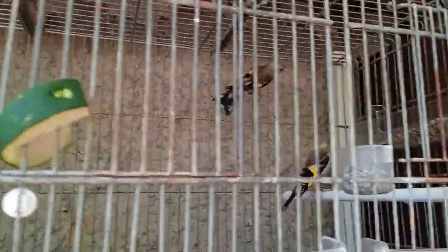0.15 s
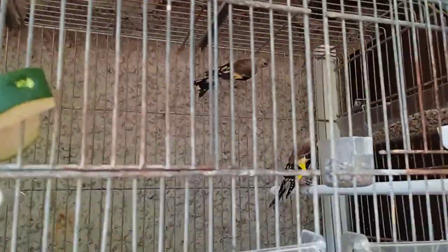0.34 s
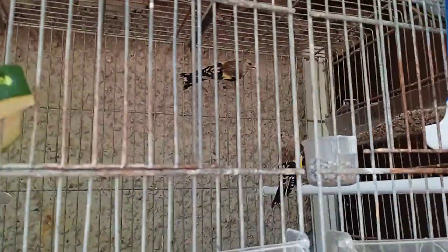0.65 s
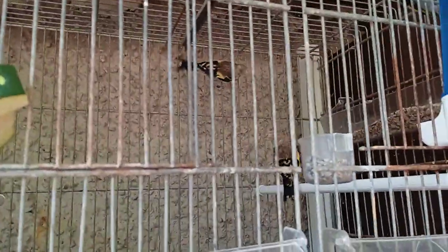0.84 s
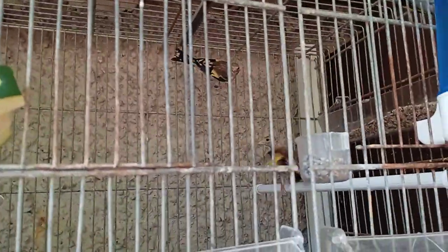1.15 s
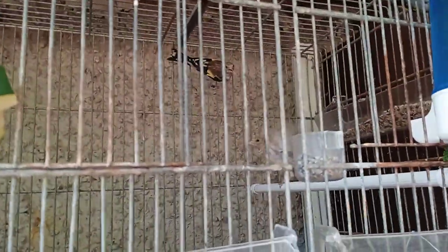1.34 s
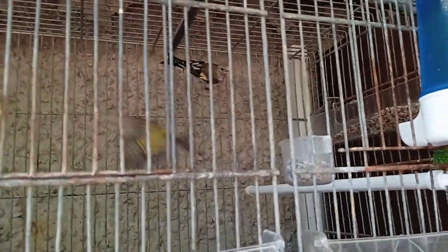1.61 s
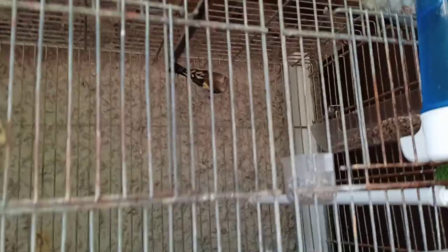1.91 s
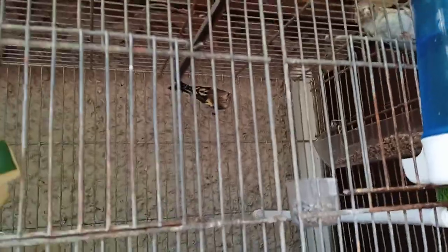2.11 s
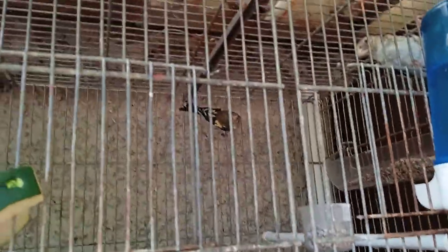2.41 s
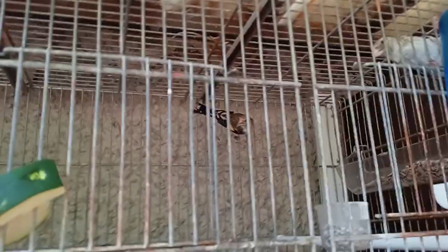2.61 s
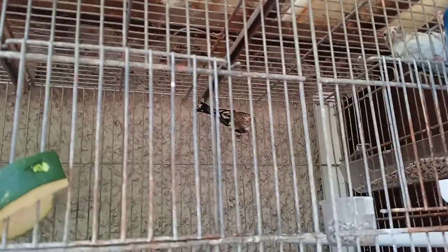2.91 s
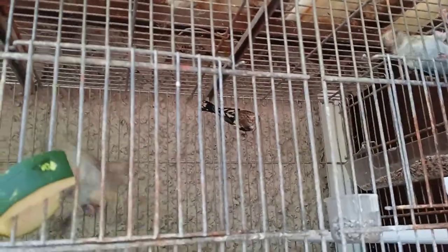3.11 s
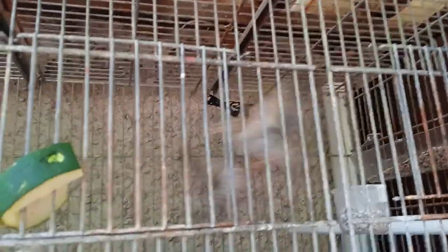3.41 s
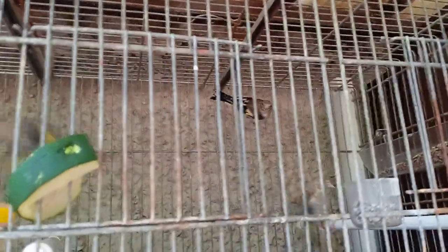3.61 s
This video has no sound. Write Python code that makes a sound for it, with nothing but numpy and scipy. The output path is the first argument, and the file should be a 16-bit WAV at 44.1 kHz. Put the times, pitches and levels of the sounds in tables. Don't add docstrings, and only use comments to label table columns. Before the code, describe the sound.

Finch chirps sweep upward in clusters, with distant peeps, light cage scuffs and faint microphone hiss.

```python
import sys
import numpy as np
from scipy import signal
from scipy.io import wavfile
from scipy.ndimage import uniform_filter1d

SR = 44100
rng = np.random.default_rng(int(sys.argv[2]) if len(sys.argv) > 2 else 0)


def boost_factor(decibels):
    exponent = np.asarray(decibels, float) / 20
    return 10 ** exponent


def int16_out(signal):
    q = np.round(np.clip(np.atleast_2d(signal).T, -1, 1) * 32767)
    wavfile.write(sys.argv[1], SR, q.astype(np.int16))


N = 165375

# time in seconds, pitch in Hz, level of the second partial in dB.
LEFT_CALL_1 = [(0.179, 1643, -60), (.205, 1756, -49), (.235, 1987, -42), (.252, 2026, -50),
               (0.267, 2082, -41), (0.283, 2098, -46), (0.301, 2112, -40.5), (0.386, 2186, -47.5),
               (0.548, 2244, -64)]
LEFT_CALL_2 = [(.692, 1300, -105), (.72, 1893, -66), (.744, 2286, -48.5), (.778, 2283, -52.5)]
LEFT_CALL_3 = [(.78, 2094, -56), (.84, 2266, -75), (0.871, 2397, -58.5), (0.904, 2443, -54),
               (.918, 2700, -53.5), (0.986, 2510, -54.5), (1.015, 2447, -71)]
LEFT_CALL_4 = [(1.41, 1118, -89), (1.446, 1596, -43.5), (1.484, 2030, -42.5), (1.539, 2510, -43),
               (1.551, 2560, -67), (1.6, 2820, -63)]
LEFT_CALL_5 = [(2.888, 1548, -80), (2.92, 1847, -44.5), (2.96, 2034, -41.5), (3.02, 2115, -44.5),
               (3.09, 2175, -49.5), (3.11, 2206, -64.5), (3.2, 2252, -55.5), (3.27, 2300, -57)]
LEFT_CALL_6 = [(3.205, 1619, -76), (3.231, 2202, -49.5), (3.25, 2336, -54), (3.27, 2375, -62)]
LEFT_CALL_7 = [(3.275, 2163, -59), (3.35, 2246, -75), (3.378, 2446, -60.5), (3.44, 2484, -48.5),
               (3.49, 2480, -50), (3.52, 2470, -70)]
LEFT_CALL_8 = [(3.463, 1396, -80), (3.49, 1668, -35.5), (3.504, 1830, -43), (3.513, 1942, -31),
               (3.548, 2230, -35), (3.572, 2360, -62), (3.586, 2403, -37.5), (3.64, 2743, -58.5),
               (3.7, 2816, -59)]
# time in seconds, pitch in Hz, level of the lowest partial in dB.
RIGHT_CALL_1 = [(0.181, 2190, -67), (0.202, 2353, -59.5), (0.213, 2470, -58.5), (0.242, 2900, -62),
                (.27, 3020, -65), (0.329, 3330, -74)]
RIGHT_CALL_2 = [(.69, 1750, -90), (0.711, 2415, -75), (0.726, 2600, -65), (0.739, 3040, -83)]
RIGHT_CALL_3 = [(.775, 3230, -61), (0.839, 3740, -52), (0.889, 4090, -52.5), (0.904, 4300, -54.5),
                (.918, 4000, -65), (0.931, 3450, -73), (0.944, 3780, -66), (0.984, 3700, -73)]
RIGHT_CALL_4 = [(1.416, 1640, -56), (1.437, 2150, -64.5), (1.46, 2350, -81), (1.478, 2430, -78),
                (1.5, 3100, -68), (1.557, 3850, -63.5)]
RIGHT_CALL_5 = [(2.884, 2000, -69.5), (2.908, 2435, -61), (2.928, 2607, -62.5), (2.969, 2950, -62.5),
                (3.0, 3060, -71), (3.051, 3160, -72)]
RIGHT_CALL_6 = [(3.194, 2350, -79), (3.213, 2600, -65), (3.237, 2970, -77)]
RIGHT_CALL_7 = [(3.27, 3248, -59), (3.383, 3960, -49), (3.46, 3850, -57)]
RIGHT_CALL_8 = [(3.458, 1810, -56.5), (3.474, 2002, -47), (3.485, 2360, -88), (3.509, 2880, -85),
                (3.561, 3650, -56), (3.588, 3640, -69), (3.608, 3780, -59), (3.632, 3900, -46.5)]
# multiple of the pitch, level in dB.
LEFT_PARTIALS = [(1, 3.5), (2, 0), (3, -16), (4, -3.5), (5, -0.5), (6, -5), (7, -5.5)]
# times left pitch, times right pitch, level in dB.
SUM_TONES = [(1, 1, -3), (2, 1, -3.5), (1, 2, -5.5)]
VOICE_CATCHES = [0.2237, 1.46, 1.467, 1.494, 1.503, 1.523, 3.473, 3.482, 3.525, 3.535, 3.544]
# level in dB, centre in Hz.
CALL_RASPS = [(-4.5, 5000), (-3, 5600), (-20, 4500), (-6.5, 5100), (-4, 5200), (-7, 6800), (-12, 5000),
              (-9.5, 4600)]
# frequency in Hz, gain in dB.
THROAT_AND_BEAK = [(1700, -6), (2400, -17.5), (3400, -5), (4800, -2), (5700, -13), (7200, -12.5),
                   (8000, -29.5), (11000, -24.5)]
# start in
# seconds, length in seconds, level in dB, first and last pitch in Hz.
SHORT_PEEPS = [(1.606, 0.03, -50.5, 3170, 3430), (1.32, 0.026, -55, 4170, 4970),
               (1.347, 0.027, -51, 4480, 5450), (1.577, 0.042, -52.5, 4270, 4170),
               (1.588, 0.054, -40, 2800, 2908), (1.631, 0.039, -51, 4300, 4100),
               (1.693, 0.031, -56.5, 4300, 4115), (1.834, 0.26, -66, 1987, 1918),
               (2.026, 0.041, -55.5, 6640, 6460), (2.156, 0.03, -57, 4630, 4960),
               (2.751, 0.03, -63.5, 4100, 4700), (2.78, 0.059, -65, 5080, 5560),
               (3.095, 0.022, -56.5, 2720, 3350), (3.159, 0.029, -58, 2730, 3300),
               (3.678, 0.019, -49.5, 4400, 4820), (1.215, .03, -73, 4500, 4700),
               (1.238, .05, -72.5, 4200, 3850), (1.282, 0.0516, -75.5, 1740, 2020),
               (1.369, .022, -57.5, 5530, 5700), (1.349, .02, -66, 2820, 3120),
               (0.576, 0.06, -70, 1617, 1670), (2.018, .04, -58.5, 7600, 7130),
               (3.196, 0.059, -55, 4500, 6910), (.715, 0.056, -52.5, 5300, 7030),
               (3.706, 0.035, -46, 4320, 5710), (3.714, 0.071, -51.5, 3400, 4080)]
# start in seconds, length in seconds, level in dB, first and last pitch in Hz.
FAR_SQUAWK = (2.465, .14, -63.5, 4901, 3401)
# time in seconds, peak in dB, level of the low part in dB.
WIRE_SCUFFS = [(0.012, -56, 5), (0.104, -61.5, 12.5), (0.377, -53.5, -16), (1.6733, -61.5, 5),
               (1.76, -56.5, 13), (1.796, -59.5, 16.5), (1.8345, -60.5, 18), (2.103, -65.5, 17),
               (2.2283, -50.5, 6.5), (2.285, -62, 4), (3.359, -59.5, 9), (3.475, -59.5, 22.5),
               (1.127, -77, -16), (1.618, -61, 4.5), (1.656, -65, 16), (1.705, -65, 12), (1.749, -67, 3),
               (1.9127, -63, 14), (1.939, -77, 23), (2.148, -61.5, 8), (2.196, -57.5, 12), (2.24, -61, 1),
               (2.423, -65, 12), (2.4708, -66, 14), (2.5856, -69.5, 15), (2.6963, -74.5, 21),
               (2.7343, -69.5, 18), (2.935, -63, 16.5), (3.056, -65, 11.5), (3.142, -68, 13),
               (3.223, -68.5, 14), (3.266, -69.5, 21.5), (3.318, -62.5, 11.5), (3.589, -63.5, 18.5),
               (3.626, -65.5, 17), (3.701, -66, 15), (.395, -58, -9), (1.409, -62, 2)]
# frequency in Hz, level in dB.
SCRAPE_COLOUR = [(1000, -14), (1600, -6), (4500, -13.5), (6400, -8.5), (11000, -22.5), (13500, -31),
                 (15300, -8)]
# frequency in Hz, level in dB.
SHUFFLE_COLOUR = [(40, -10), (85, -0.5), (200, -3.5), (560, -8.5), (1900, -14), (2600, -35.5)]
# time in seconds, level in dB.
STIRRING = [(0, -62), (.08, -61), (.19, -71), (.6, -77.5), (1.58, -78), (1.66, -67), (2.15, -68.5),
            (2.3, -61), (2.39, -72), (2.5, -67), (2.66, -75), (2.76, -68), (2.88, -75.5), (3.2, -71.5),
            (3.46, -63), (3.75, -67.5)]
# frequency in Hz, level in dB, seconds to fall 60 dB.
FEEDER_TONES = [(653.3, -58.5, 1), (971, -42.5, 0.12), (1806, -46.5, 0.22)]
# time in seconds, level in dB.
FEEDER_KNOCKS = [
    (.043, -8),
    (.056, -9),
    (.066, -4.5),
    (0.081, -10.5),
]
# frequency in Hz, level in dB.
HISS_COLOUR = [(40, -35), (90, -8), (700, -31), (1700, -11.5), (2600, -16.5), (4500, -15.5), (6000, -1),
               (13000, -37.5), (15300, -17.5)]

STEADY_DB, BROKEN_DB = 4, 5.5
PITCH_JITTER = 0.00667


def read(points, hz):
    f, value = np.transpose(points)
    return np.interp(np.log(hz + 1), np.log(f + 1), value)


def slow(length, span):
    x = uniform_filter1d(rng.standard_normal(length), size=span)
    x = uniform_filter1d(x, size=span)
    return x / x.std()


def noise(spectrum, patchy_db):
    a, b, patch = rng.standard_normal((N // 128 + 5, 257, 3)).T
    patch = uniform_filter1d(uniform_filter1d(patch, 6, 0), 12, 1)
    colour_db = read(spectrum, np.fft.rfftfreq(512, 1 / SR))[:, None]
    z = (a + 1j * b) * boost_factor(colour_db + patchy_db * patch / patch.std())
    x = signal.istft(z, nperseg=512, noverlap=384)[1][:N]
    return x / x.std()


def band(length, hz, width_hz):
    span = round(SR / width_hz)
    turn = 2 * np.pi * np.cumsum(hz * np.ones(length)) / SR
    return slow(length, span=span) * np.cos(turn) + slow(length, span=span) * np.sin(turn)


def hiss():
    return boost_factor(-67) * noise(HISS_COLOUR, 1.6)


def scuffs():
    t, high, low = np.arange(N) / SR, np.zeros(N), np.zeros(N)
    for s, db, low_db in WIRE_SCUFFS:
        u = np.maximum(t - s + 0.0018, 0)
        shape = np.minimum(u / 0.0029, 1) * np.exp(-u / 0.016) * boost_factor(db)
        high += shape
        low += shape * boost_factor(low_db)
    grit = boost_factor(3.17 * slow(N, span=50))
    stir = boost_factor(np.interp(t, *np.transpose(STIRRING)) + 1.4 * slow(N, span=700))
    bright = boost_factor(3) * high + boost_factor(-9.5) * stir ** 2 / stir.mean()
    dull = boost_factor(-11.5) * low + stir
    return grit * bright * noise(SCRAPE_COLOUR, 1.6) + dull * noise(SHUFFLE_COLOUR, 3.0)


def feeder():
    t, out = np.arange(N) / SR, np.zeros(N)
    for s, knock_db in FEEDER_KNOCKS:
        for hz, db, t60 in FEEDER_TONES:
            fade = boost_factor(knock_db + db - 60 * abs(t - s) / t60) * (t > s)
            out += fade * np.sin(2 * np.pi * hz * (t - s))
    return out * boost_factor(5.7 * np.minimum(slow(N, span=60), .8))


def squawk():
    s, length, db, first_hz, last_hz = FAR_SQUAWK
    u, out = np.linspace(0, 1, round(length * SR)), np.zeros(N)
    hz = last_hz + (first_hz - last_hz) * (1 - u) ** 2
    swell = boost_factor(db + 3.2 * slow(len(u), span=150)) * np.sin(np.pi * u)
    out[round(s * SR):][:len(u)] = swell * band(len(u), hz, 900)
    return out


def peeps():
    out = np.zeros(N + SR)
    for s, length, db, first_hz, last_hz in SHORT_PEEPS:
        u = np.linspace(0, 1, round(length * SR))
        hz = last_hz + (first_hz - last_hz) * (1 - u) ** 2.4
        turn = 2 * np.pi * np.cumsum(hz) / SR
        out[round(s * SR):][:len(u)] += boost_factor(db) * np.sqrt(abs(np.sin(np.pi * u))) * np.sin(turn)
    return out[:N] * boost_factor(5 * np.minimum(slow(N, span=150), .5))


def room(x):
    at = np.arange(90, 12000, 22) + rng.integers(0, 22, 542)
    taps = np.zeros(12100)
    taps[at] = rng.choice([-1., 1.], len(at)) * boost_factor(-60 * at / SR / 0.1)
    return signal.fftconvolve(x, taps / np.linalg.norm(taps))[:N]


def side(curve, t):
    s, hz, db = np.transpose(curve)
    gate = np.clip(np.minimum(t - s[0], s[-1] - t) / 0.005, 0, 1)
    pitch = uniform_filter1d(np.interp(t, s, hz), size=300)
    pitch = pitch * (1 + PITCH_JITTER * slow(len(t), span=60))
    return 2 * np.pi * np.cumsum(pitch) / SR, pitch, gate * np.sqrt(2) * boost_factor(np.interp(t, s, db))


def finch(left, right, rasp_db, rasp_hz):
    first = round(SR * min(left[0][0], right[0][0]) - 500)
    last = round(SR * max(left[-1][0], right[-1][0]) + 500)
    at = np.arange(first, last)
    length, since = len(at), np.arange(len(at)) / SR
    a, a_hz, a_gain = side(left, at / SR)
    b, b_hz, b_gain = side(right, at / SR)
    a_gain = a_gain / boost_factor(read(THROAT_AND_BEAK, 2 * a_hz))
    b_gain = b_gain / boost_factor(read(THROAT_AND_BEAK, b_hz))
    hold = 0.56
    held = a_gain ** hold * boost_factor(-51 * (1 - hold))
    both = a_gain ** 0.28 * b_gain ** 0.69 * (0.18 + np.exp(-since / .05)) * boost_factor(4)

    parts = [((a_gain if 1 < k < 4 else held) * boost_factor(db), k, 0) for k, db in LEFT_PARTIALS]
    parts += [(b_gain, 0, 1), (b_gain * boost_factor(2.0), 0, 2), (b_gain * boost_factor(-12), 0, 3)]
    parts += [(both * boost_factor(db), m, n) for m, n, db in SUM_TONES]
    voice = np.zeros(length)
    for gain, m, n in parts:
        waver_db = STEADY_DB if m + 2 * n < 3 else BROKEN_DB
        beak_db = read(THROAT_AND_BEAK, abs(m * a_hz + n * b_hz))
        level = boost_factor(beak_db + waver_db * np.minimum(slow(length, span=170), .5))
        voice += gain * level * np.sin(m * a + n * b)

    rasp = both * boost_factor(rasp_db + 2.1 * slow(length, span=90)) * np.exp(-since / 0.051)
    rasp = rasp * (band(length, rasp_hz, 3500) + boost_factor(-15.5) * band(length, 8700, 9000))
    haze = (a_gain + b_gain) * boost_factor(-27) * band(length, 1.8 * a_hz, 1530)
    out = np.zeros(N)
    out[at] = voice + rasp + haze
    return out


def finches():
    pairs = [(LEFT_CALL_1, RIGHT_CALL_1), (LEFT_CALL_2, RIGHT_CALL_2), (LEFT_CALL_3, RIGHT_CALL_3),
             (LEFT_CALL_4, RIGHT_CALL_4), (LEFT_CALL_5, RIGHT_CALL_5), (LEFT_CALL_6, RIGHT_CALL_6),
             (LEFT_CALL_7, RIGHT_CALL_7), (LEFT_CALL_8, RIGHT_CALL_8)]
    calls = sum(finch(*pair, *rasp) for pair, rasp in zip(pairs, CALL_RASPS))
    t, catch_s = np.arange(N) / SR, .0018
    dips = sum(np.exp(-((t - s) / catch_s) ** 2) for s in VOICE_CATCHES)
    return calls * (1 - 0.54 * dips)


def scene():
    near = finches()
    far = peeps() + squawk()
    echoes = room(boost_factor(-12) * near + boost_factor(-10) * far)
    return (near + far + echoes + scuffs() + feeder() + hiss())[None]


def band_limit(x):
    return signal.sosfilt(signal.butter(12, 15920, fs=SR, output="sos"), x)


def record(dry):
    treble_cut = signal.firwin(511, 15850, window=("kaiser", 9), fs=SR)
    mix = signal.oaconvolve(dry, treble_cut[None], "same")
    low_cut = signal.butter(4, 57.5, "high", fs=SR, output="sos")
    mix = signal.sosfilt(low_cut, mix)
    return band_limit(mix)


dry = scene()
out = record(dry)
int16_out(out)
```